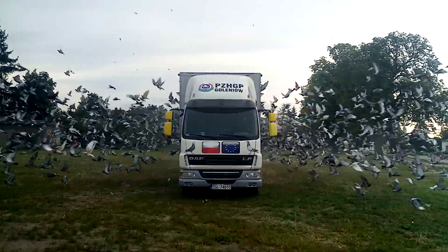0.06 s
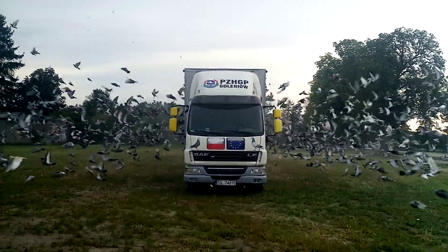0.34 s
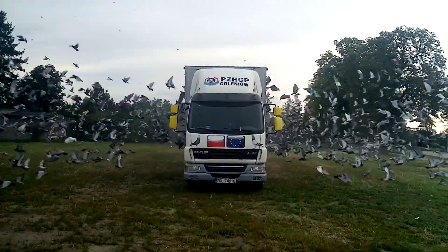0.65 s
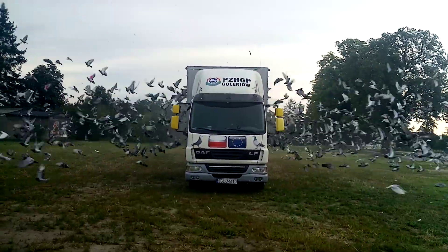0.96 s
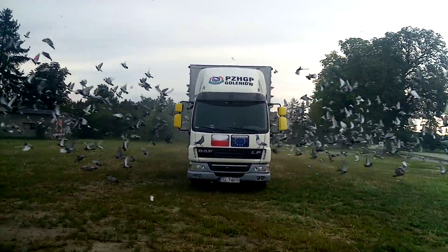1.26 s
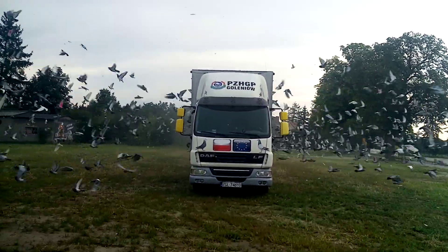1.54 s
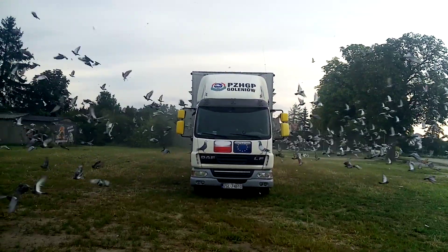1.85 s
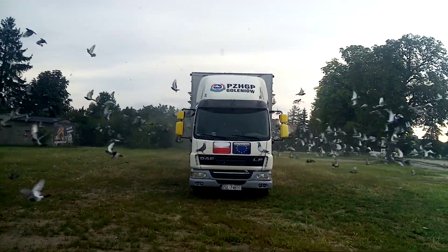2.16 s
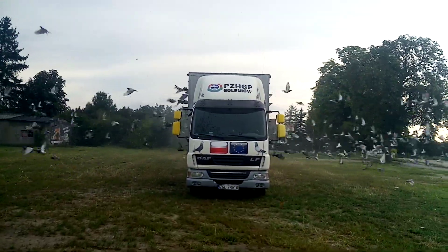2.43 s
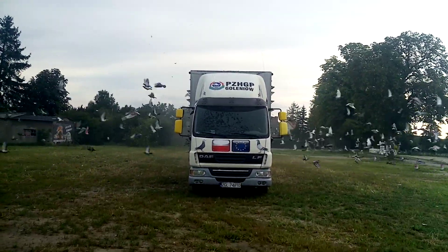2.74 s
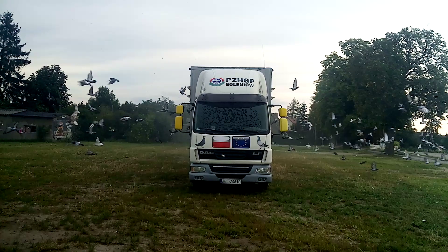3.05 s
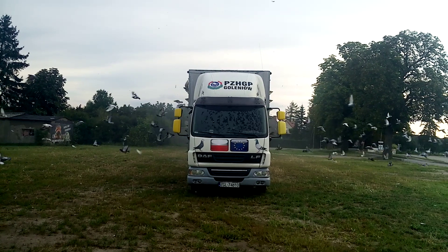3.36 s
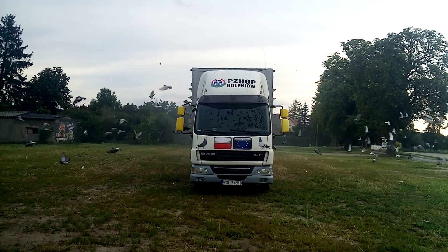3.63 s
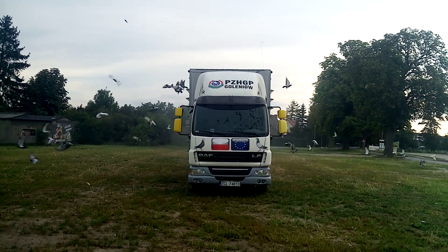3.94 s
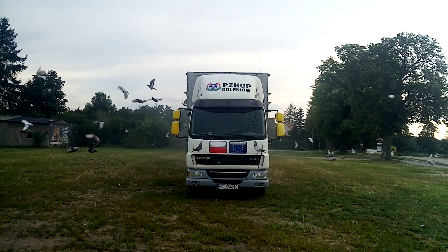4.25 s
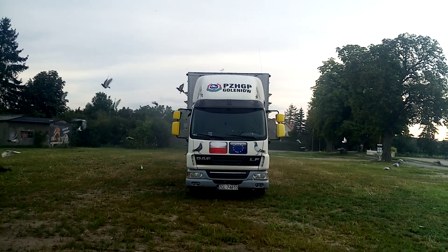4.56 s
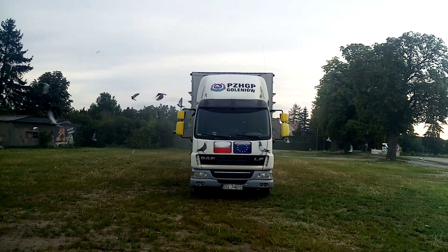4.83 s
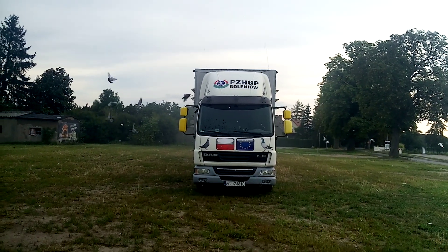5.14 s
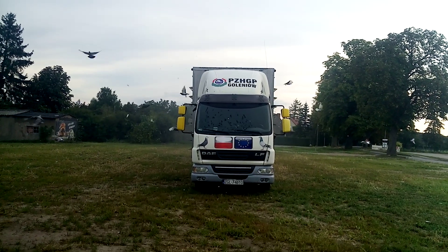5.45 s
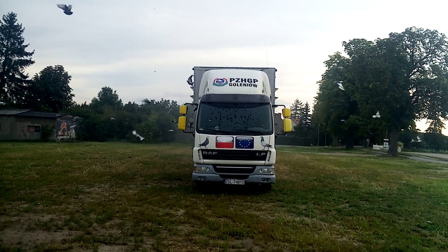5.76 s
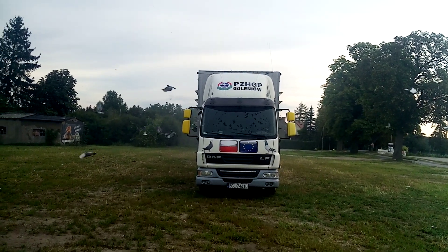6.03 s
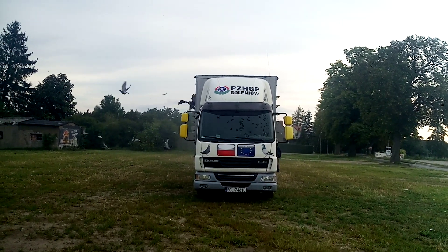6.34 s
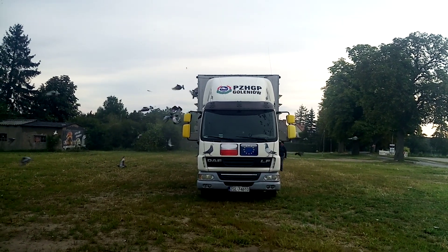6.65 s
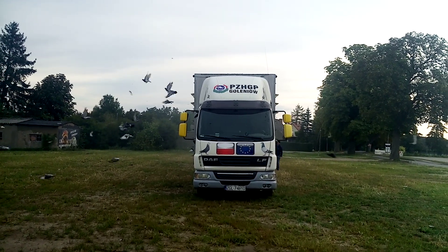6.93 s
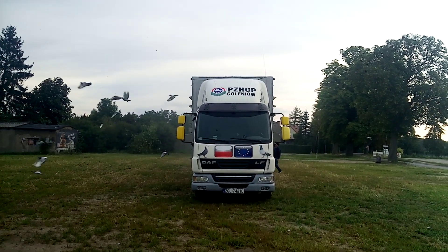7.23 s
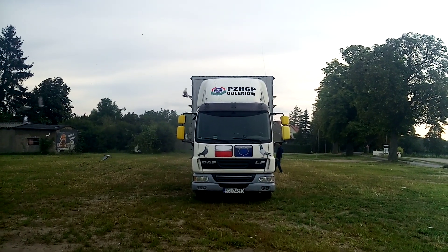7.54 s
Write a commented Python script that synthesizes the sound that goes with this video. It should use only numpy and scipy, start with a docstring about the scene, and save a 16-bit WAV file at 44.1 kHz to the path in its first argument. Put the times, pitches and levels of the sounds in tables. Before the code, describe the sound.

From the very start, a large flock of pigeons is taking off in an open field: a dense rush of swishing feathers, sharp wing slaps and dull puffs of air, with crisp claps from the nearest birds. A light wind rumbles underneath. The flapping is thickest in the first second and has begun to thin by 2 seconds. From about 2 to 4 seconds, irregular gusts buffet the microphone with deep blasts, hardest around 2.4 to 2.8 seconds, when the birds briefly dip in volume. The wind then settles to a faint rumble with occasional small bumps. From 4 seconds on, fewer birds remain and individual wing claps stand out, with small flurries near 5.4 and 6.5 seconds. A few stragglers are still flapping softly as the sound ends just before 8 seconds.

```python
"""Pigeons released in a windy field

A big flock pours out of a lorry into an open field and thins to a few stragglers.
Every wingbeat gives a swish of feathers and often a sharp slap; the nearest birds clap their wings.
Wind buffets the microphone, and its limiter turns the birds down under the hardest gusts."""
import sys
import numpy as np
from scipy import signal
from scipy.fft import rfft, irfft, next_fast_len
from scipy.io import wavfile
from scipy.ndimage import uniform_filter1d

SR = 44100
rng = np.random.default_rng(int(sys.argv[2]) if len(sys.argv) > 2 else 0)


def log_audio(samples):
    """Write samples as a 16-bit WAV file to the path given in sys.argv[1]."""
    # one column per channel
    frames = np.atleast_2d(samples).T
    # limit to full scale, then quantise
    limited = np.clip(frames, -1, 1)
    pcm = np.round(limited * 32767).astype(np.int16)
    wavfile.write(sys.argv[1], SR, pcm)


N = 343539

# how thick the flock is, as the loudness of its feathers: t/s, level/dB
FLOCK_LEVEL = [(0, -29.5), (.7, -30), (1.1, -31), (1.9, -33), (2.15, -36.5), (2.5, -35.5), (3.8, -37.5),
               (4.2, -40.5), (4.6, -40.5), (5.25, -43.5), (5.42, -39), (6.05, -42), (6.5, -39), (7.3, -46),
               (7.79, -45.5)]
# wing slaps as heard through the microphone, with its treble peaks: f/Hz, level/dB
SLAP_AT_MIC = [(300, -5), (900, 0), (2400, 7), (3600, 0), (5200, 5), (6600, 7.5), (8300, 7), (10000, -4.5),
               (13300, -13.5), (14900, -0.5), (16000, 2)]
# gusts on the microphone: start/s, length/s, strength/dB, top of the blast's range/Hz
WIND_GUSTS = [(0.113, 0.23, -29, 150), (1.991, 0.062, -16.5, 364), (2.051, 0.078, -15.5, 513),
              (2.155, 0.053, -17, 333), (2.201, 0.085, -9.5, 216), (2.313, .22, -19, 260),
              (2.422, 0.012, -5.5, 337), (2.554, 0.11, -6.5, 530), (2.664, 0.086, -15, 290),
              (2.774, 0.0076, -5, 510), (2.831, 0.028, -14.5, 280), (2.941, 0.034, -25, 250),
              (2.992, 0.0083, -8.5, 370), (3.07, .19, -18, 290), (3.352, 0.13, -20.5, 270),
              (3.5, 0.086, -18.5, 240), (3.723, 0.052, -13, 333), (3.806, 0.044, -18, 190),
              (3.952, 0.081, -22, 220), (4.09, 0.42, -34.5, 150), (4.55, 0.1, -29, 131),
              (4.894, 0.032, -37, 120), (5.127, 0.013, -24.5, 140), (5.167, 0.077, -32.5, 131),
              (5.945, .07, -37, 120), (6.136, 0.068, -29.5, 130), (6.258, .06, -33.5, 120),
              (7.004, 0.054, -41, 120), (7.318, 0.019, -27.5, 150), (7.478, 0.029, -27, 120),
              (7.538, 0.027, -25.5, 120), (7.694, 0.085, -30.5, 130)]
TOP_HZ = 15800


def from_db(db):
    """Turn decibels into a factor to multiply a sound by."""
    return 10 ** (np.asarray(db) / 20)


def in_time(rows):
    """Join rows of t/s, value with straight lines, giving a value at every sample."""
    return np.interp(np.arange(N) / SR, *np.transpose(rows))


def noise(colour):
    """Steady noise of average power 1, shaped by rows of f/Hz, level/dB."""
    hz, db = np.transpose(colour)
    size = next_fast_len(N)
    bin_hz = np.maximum(np.fft.rfftfreq(size, 1 / SR), 1)
    gain = from_db(np.interp(np.log(bin_hz), np.log(hz), db))
    shaped = irfft(gain * rfft(rng.standard_normal(size)))[:N]
    return shaped / np.sqrt(np.mean(shaped ** 2) + 1e-20)


def mean_over(power, seconds):
    """A moving average that never quite reaches zero."""
    return np.maximum(uniform_filter1d(power, max(int(seconds * SR), 1)), 0) + 1e-14


def lag(x, seconds):
    """Smooth a signal, so that each spike gets a fading tail."""
    keep = np.exp(-1 / (seconds * SR))
    return signal.lfilter([1 - keep], [1, -keep], x + 1e-18)


def evened(x, seconds):
    """Hold a noise near power 1, averaged over the given time."""
    return x / np.sqrt(mean_over(x ** 2, seconds))


def wingbeats(slow_hz=6.0, fast_hz=9.5, spread_db=0.5, count=80):
    """One spike of power per wingbeat: each bird keeps its own pace and swells as it flies past."""
    birds_in_earshot = 46 * 2 ** ((in_time(FLOCK_LEVEL) + 29.5) / 9)   # half as many per 9 dB drop
    beats = np.zeros(N)
    for bird, (pace, start, passing) in enumerate(rng.random((count, 3))):
        slip, force = rng.standard_normal((2, count))
        beat_hz = slow_hz + pace * (fast_hz - slow_hz)
        times = (np.arange(count) - start + .05 * slip) / beat_hz
        nearness = np.sin(2 * np.pi * (times / 2 + passing))
        power = from_db(spread_db * np.minimum(force + nearness, 1.6)) ** 2
        at = (times * SR).astype(int)
        heard = (at >= 0) & (at < N) & (bird < birds_in_earshot[np.clip(at, 0, N - 1)])
        beats[at[heard]] += power[heard]
    return beats / np.maximum(mean_over(beats, .4), 1e-6)


def wing_slaps(beats, rise_s=0.00016, fade_s=0.0012, colour_db=5.5):
    """Each wing slaps with its own tone: every frequency band gets a random share of every beat."""
    edges_hz = np.append(np.linspace(400, 10500, 9), TOP_HZ)
    at = np.flatnonzero(beats)
    sources = [noise(SLAP_AT_MIC), noise(SLAP_AT_MIC)]
    out = np.zeros(N)
    for k, band_hz in enumerate(zip(edges_hz, edges_hz[1:])):
        share = from_db(colour_db * np.clip(rng.standard_normal(N)[at], -2, 2)) ** 2
        power = np.zeros(N)
        power[at] = beats[at] * share / share.mean()
        band = signal.sosfilt(signal.butter(2, band_hz, "band", fs=SR, output="sos"), sources[k % 2])
        out += np.sqrt(lag(lag(power, fade_s), rise_s)) * band
    return out


def wing_rush(beats, puff_share=0.88, puff_s=0.0096):
    """Every downstroke pushes a dull puff of air; far ones blend together."""
    # loudness of the air pushed by the wings: t/s, level/dB
    rush_level = [(0, -31), (1.9, -33), (2.4, -35.7), (3.4, -33.5), (4.7, -39), (6.5, -38.5), (7.4, -44.5),
                  (7.79, -44.5)]
    # dull rush of the flock, with the microphone's resonance near 830 Hz: f/Hz, level/dB
    rush_at_mic = [(40, -13), (100, -4), (200, 0), (350, -1), (500, -4), (660, -3), (830, 0), (950, -3.5),
                   (1100, -8.5), (2000, -14), (4000, -20.5), (16000, -40)]
    power = 1 - puff_share + puff_share * lag(lag(beats, puff_s), puff_s)
    return from_db(in_time(rush_level)) * np.sqrt(power) * noise(rush_at_mic)


def flock(swish_s=0.02):
    """Each wingbeat is a short slap, a longer swish and a puff; distant birds merge into a hiss."""
    # feather swishes as heard through the microphone, with its treble peaks: f/Hz, level/dB
    swish_at_mic = [(300, 6), (700, -9.5), (1200, 1.5), (1700, 6.5), (2500, 4), (3200, -0.5), (4200, -2),
                    (5500, 0.5), (6700, 2), (8200, 1.5), (9800, -10), (13500, -22.5), (14900, -7),
                    (16000, -11)]
    beats = wingbeats()
    swishes = np.sqrt(lag(lag(beats, swish_s), swish_s)) * noise(swish_at_mic)
    slaps = wing_slaps(beats)
    far_hiss = noise(swish_at_mic)
    feathers = from_db(-3) * slaps + from_db(-7.5) * swishes + from_db(-4) * far_hiss
    return from_db(in_time(FLOCK_LEVEL)) * feathers + wing_rush(beats)


def wing_claps(brush_s=0.0018, rise_s=0.0015, rustle_s=0.0054, rustle_db=-14.5):
    """Feathers brush, the wing tips meet in a burst of a few milliseconds, a short rustle follows."""
    # claps of the nearest birds: t/s, level/dB, then added to that level: low/dB, middle/dB, high/dB
    claps = [(0.0643, -20, -21, -20, -9), (0.3505, -16, -15, -19, -9.5), (0.3691, -21, -8, -17, -13),
             (0.476, -15.5, -17, -13.5, -14), (0.7384, -12.5, -19, -22, -12),
             (0.7817, -17.5, -16, -26, -10), (0.854, -18, -17, -17, -17), (0.8834, -20.5, -14, -24, -11),
             (0.9915, -17, -31, -11, -12), (1.0098, -17.5, -18, -9.5, -13), (1.1358, -19.5, -14, -25, -10),
             (1.2377, -20, -7.5, -14, -10), (1.3862, -22, -14, -9, -17), (1.5499, -21, -12, -18, -9),
             (2.1181, -21, -14.5, -15, -14), (2.411, -23.5, -23, -13, -11), (2.882, -17, -18.5, -27, -10),
             (3.0924, -17.5, -22, -21, -12), (3.4223, -22.5, -23, -13, -11), (3.643, -17.5, -19, -13, -11),
             (3.6515, -15, -19, -18, -13.5), (3.8856, -21, -18, -14, -12.5), (4.0387, -20, -18, -20, -12),
             (4.0693, -21.5, -16, -16, -13), (4.149, -15.5, -18, -13.5, -12), (4.3121, -25, -20, -13, -13),
             (4.38, -25, -23, -16, -10.5), (4.443, -25, -24, -12, -9.5), (4.5447, -21, -18, -18, -13),
             (4.5816, -23.5, -13, -14, -14), (4.6105, -27, -17, -11, -12), (4.7382, -23.5, -13, -14, -16),
             (5.0, -29.5, -18, -28, -10.5), (5.2723, -27, -14, -17, -12), (5.3852, -24.5, -13, -16, -10),
             (5.5265, -21, -19, -18, -14), (5.7234, -20.5, -17, -21, -10), (5.8388, -24, -15, -24, -8),
             (5.8564, -22.5, -10.5, -16, -11.5), (5.9887, -24.5, -9, -25, -8.5),
             (6.11, -26, -12.5, -16, -11), (6.1345, -25, -23, -21, -8.5), (6.232, -19, -19, -15.5, -13.5),
             (6.35, -24, -11, -16, -12), (6.4944, -25, -13, -19, -9), (6.5236, -28, -18, -19, -9),
             (6.563, -26.5, -12, -18, -11), (6.6116, -28, -15, -12, -7), (6.6847, -20.5, -14, -14, -16),
             (6.78, -22, -20, -15, -13.5), (6.7916, -23.5, -16, -13, -11), (7.002, -22.5, -20, -17, -11),
             (7.1115, -25, -19, -14.5, -13), (7.1547, -32, -15, -18, -6), (7.1737, -27.5, -16, -14, -13),
             (7.3327, -28, -22, -13, -13), (7.4986, -34, -12, -10, -9), (7.7206, -22, -22, -17, -16)]
    # borders of the low, middle and high bands of a clap: f/Hz
    edges_hz = [300, 3500, 6000, 16500]
    boost_db = np.array([3.1, 1.5, 1.0])   # low, middle, high
    power = np.zeros((3, N))
    for start, level_db, *colour_db in claps:
        at = np.arange(max(int((start - .015) * SR), 0), min(int((start + .04) * SR), N))
        t = at / SR - start
        age = np.maximum(t, 0) / rise_s
        burst = (age * np.exp(1 - age)) ** 2
        rustle = from_db(rustle_db) ** 2 * np.exp(-np.where(t < 0, -t / brush_s, t / rustle_s))
        band_db = level_db + boost_db + colour_db
        power[:, at] += from_db(band_db)[:, None] ** 2 * (burst + rustle)
    out, source = np.zeros(N), noise(SLAP_AT_MIC)
    for band_power, band_hz in zip(power, zip(edges_hz, edges_hz[1:])):
        band = signal.sosfilt(signal.butter(3, band_hz, "band", fs=SR, output="sos"), source)
        out += np.sqrt(band_power) * evened(band, 0.003)
        source = np.roll(source, SR)   # another stretch of noise for the next band
    return out


def gust_shape(start, length, rise_s=0.0048, fade_s=0.011):
    """A gust rises quickly, holds and dies away: its sample positions and its height at each."""
    at = np.arange(max(int(start * SR), 0), min(int((start + length + .1) * SR), N))
    t = at / SR - start
    return at, np.clip(t / rise_s, 0, 1) * np.exp(-np.maximum(t - length, 0) / fade_s)


def wind_strength():
    """The gusts on top of the breeze, in dB."""
    # the breeze between the gusts: t/s, level/dB
    breeze_level = [(0, -36), (1.9, -35.5), (3.0, -19), (4.2, -40.5), (4.8, -43), (7.79, -43)]
    power = from_db(in_time(breeze_level)) ** 2
    for start, length, db, _ in WIND_GUSTS:
        at, shape = gust_shape(start, length)
        power[at] += (from_db(db) * shape) ** 2
    return 10 * np.log10(power)


def wind(rumble_limit_db=-26.5, strong_db=-13.0):
    """Air churns at the microphone: the rumble levels off, while faster air sheds ever more swirls."""
    # tone colour of the deep rumble: f/Hz, level/dB
    rumble_colour = [(15, -29), (30, -36), (50, -4), (80, 1.5), (115, -2), (170, -7.5), (260, -39.5),
                     (400, -44), (800, -50), (3000, -85)]
    # tone colour of the small swirls: f/Hz, level/dB
    swirl_colour = [(20, -41), (55, -31), (100, 5.5), (150, -4), (250, -5), (400, -19), (600, -44),
                    (1000, -81), (3000, -75)]
    # how fast the level flutters as the air arrives in separate puffs: f/Hz, level/dB
    puff_rates = [(2, 23), (12, 6), (28, 10.5), (60, -15.5), (300, -83)]
    level_db = wind_strength()
    rumble_gain = from_db(level_db) / np.hypot(1, from_db(level_db - rumble_limit_db))
    swirl_gain = from_db(level_db - 2.5 + 0.73 * np.minimum(level_db - strong_db, 0))
    puffs = from_db(4 * noise(puff_rates))
    rumble = rumble_gain * evened(puffs * noise(rumble_colour), 0.119)
    swirls = swirl_gain * evened(puffs * noise(swirl_colour), 0.047)
    return rumble + swirls + gust_blasts(puffs)


def gust_blasts(puffs, hard_db=-5.5):
    """Each gust hits the microphone with a low blast; the harder the gust, the more it stands out."""
    # tone colour of a blast of air: f/Hz, level/dB
    blast_colour = [(20, -32), (55, -7), (100, 2.5), (170, 3.5), (270, -7.5), (420, -9.5), (650, -12),
                    (1000, -16.5), (4000, -45)]
    out, rough_air = np.zeros(N), puffs * noise(blast_colour)
    for start, length, db, reach_hz in WIND_GUSTS:
        at, shape = gust_shape(start, length)
        air = signal.sosfilt(signal.butter(3, reach_hz, fs=SR, output="sos"), rough_air[at])
        blast_db = db - 0.5 + 0.32 * min(db - hard_db, 0)
        out[at] += from_db(blast_db) * shape * evened(air, 0.0228)
    return out


def scene():
    """Birds and wind at one microphone."""
    return (flock() + wing_claps() + wind())[None]


def microphone(x, ring_hz=6470.0, ring_width_hz=330.0, low_cut_hz=40.0):
    """The microphone's little opening rings in the treble, and the deepest bass is cut."""
    b, a = signal.iirpeak(ring_hz, ring_hz / ring_width_hz, fs=SR)
    low_cut = signal.butter(3, low_cut_hz, "high", fs=SR, output="sos")
    return signal.sosfilt(low_cut, x + 0.43 * signal.lfilter(b, a, x))


def limiter(x, threshold_db=-17.0, squeeze=0.7, recovery_db_per_s=108.0, attack_s=0.0015):
    """Turn the volume down quickly when the sound gets too loud, then let it creep back."""
    level_db = 10 * np.log10(mean_over(x ** 2, 0.012))
    cut_db = squeeze * np.maximum(level_db - threshold_db, 0)
    ramp = recovery_db_per_s * np.arange(N) / SR
    held_db = np.maximum.accumulate(cut_db + ramp) - ramp   # each cut wears off at a steady rate
    return x * from_db(-lag(held_db, attack_s))


def record(dry):
    """The sound passes the microphone, the limiter and a steep cut of the highest treble."""
    top_cut = signal.ellip(12, .2, 90, TOP_HZ, fs=SR, output="sos")
    return signal.sosfilt(top_cut, limiter(microphone(dry[0])))[None]


dry = scene()
out = record(dry)
log_audio(out)
```